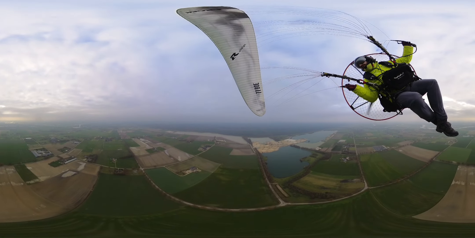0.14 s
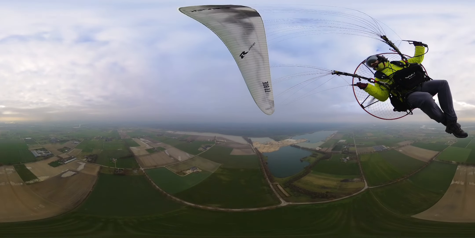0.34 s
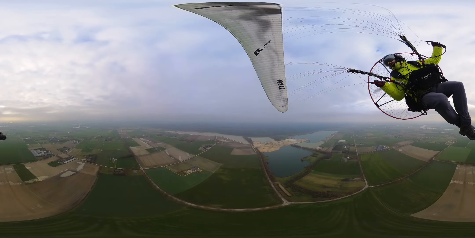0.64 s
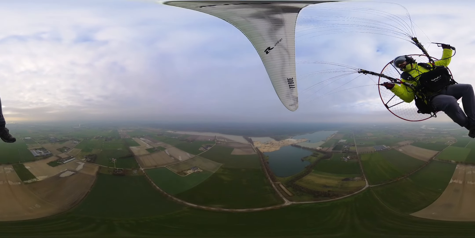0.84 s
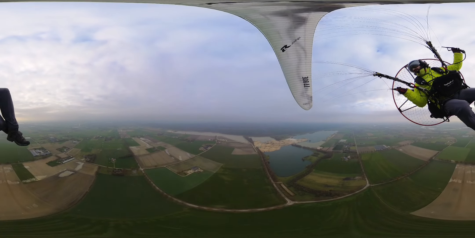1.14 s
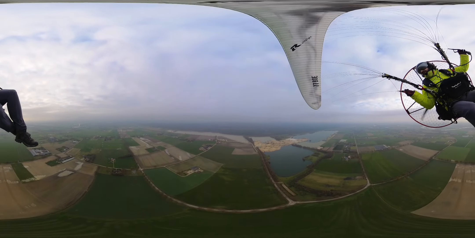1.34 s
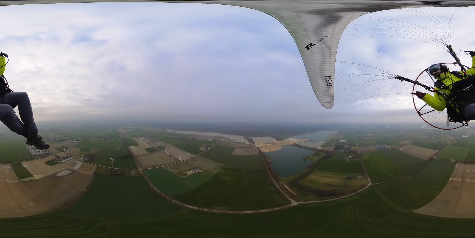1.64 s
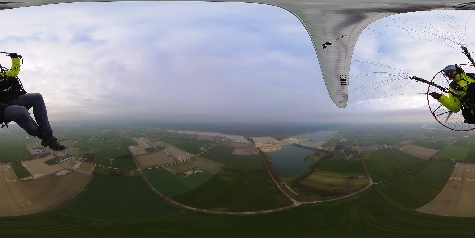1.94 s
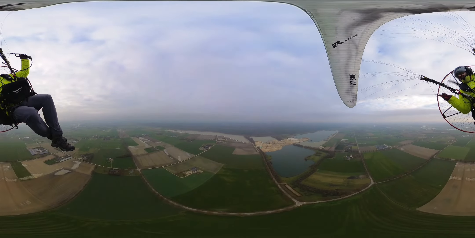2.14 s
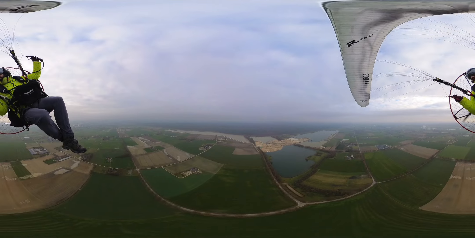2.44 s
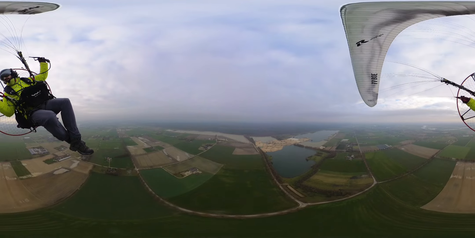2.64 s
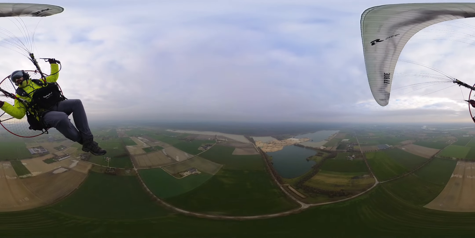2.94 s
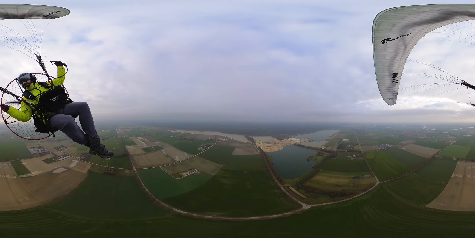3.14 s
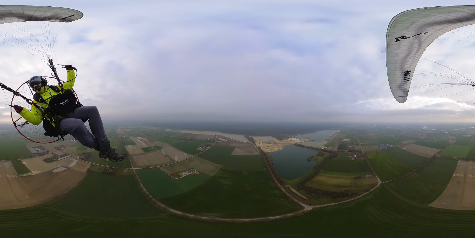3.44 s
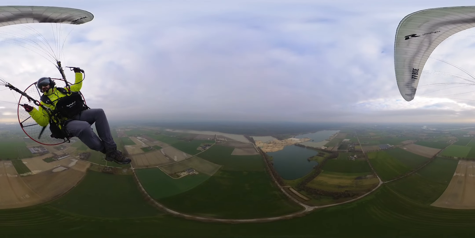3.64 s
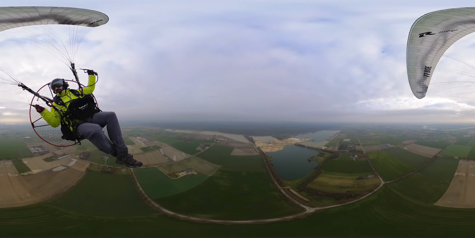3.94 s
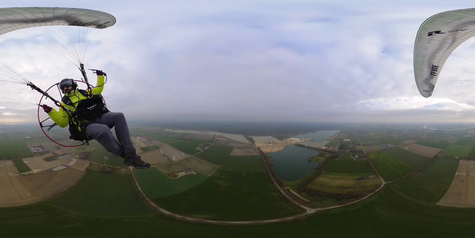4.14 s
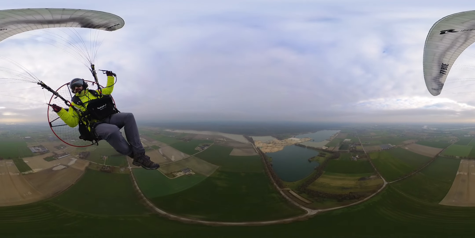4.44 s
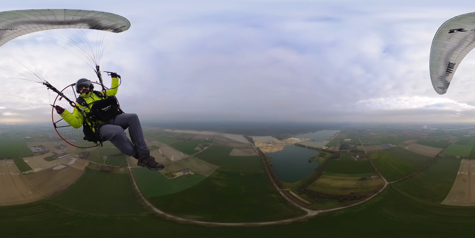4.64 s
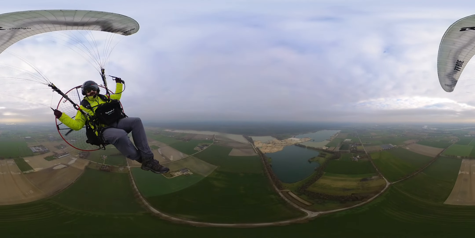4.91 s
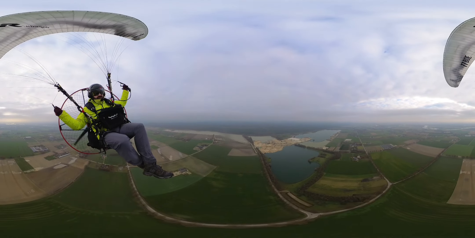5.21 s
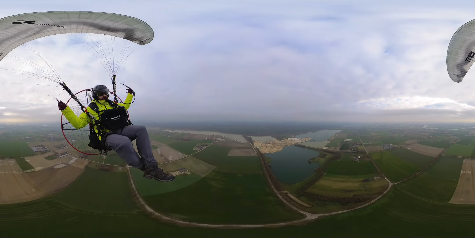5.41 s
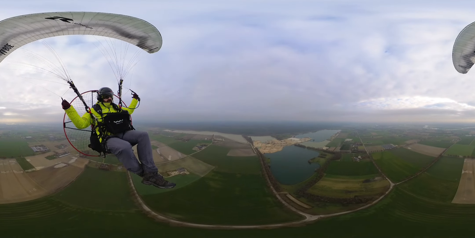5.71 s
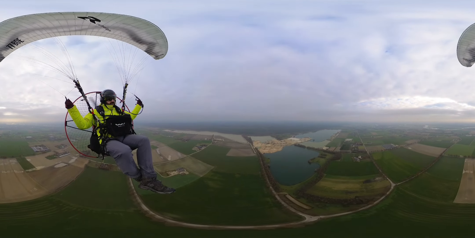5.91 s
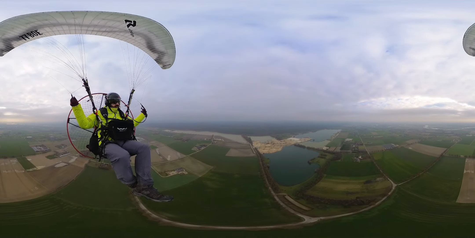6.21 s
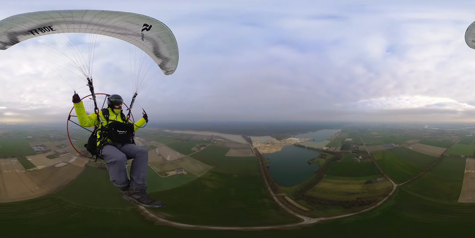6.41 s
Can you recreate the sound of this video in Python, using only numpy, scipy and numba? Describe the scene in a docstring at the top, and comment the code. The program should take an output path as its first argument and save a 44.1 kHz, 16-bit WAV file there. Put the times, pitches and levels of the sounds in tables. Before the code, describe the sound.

A single-cylinder two-stroke paramotor runs close by in open air. A second drone beats against it at first, then fades. Weak firings mix with irregular hard pops over a deep vibrating hum and rumbling, hissing wind. Brief tinny buzzes appear midway. Finally the throttle opens, the burn lopes, then steadies, and a thin high hiss swells. The microphone shares the shaking pole.

```python
"""A back-mounted one-cylinder two-stroke at part throttle in flight, heard by a camera on a pole.
First a second, steadier drone beats against the engine; it swells and sinks, then slowly rises again.
Wind rumbles and hisses throughout. Most crank turns fire weakly, some hard with a pop; the crank shakes
the pole into a deep hum. Brief tinny buzzes follow from mid-flight on. At the end the throttle opens:
speed rises, the burn lopes in threes and evens out, the hum sinks and a thin top hiss swells."""
import sys
import numpy as np
from scipy import signal
from scipy.fft import rfft, irfft
from scipy.io import wavfile
from scipy.ndimage import uniform_filter1d
from numba import njit

SR = 44100
rng = np.random.default_rng(int(sys.argv[2]) if len(sys.argv) > 2 else 0)


def to_wav(sig):
    """Store sig (one row per channel, or 1-D mono) as 16-bit WAV at the path in sys.argv[1].

    Samples outside -1..1 are clipped; the rate is SR.
    """
    pcm = np.clip(np.atleast_2d(sig), -1, 1) * 32767
    pcm = np.round(pcm).astype(np.int16)
    wavfile.write(sys.argv[1], SR, pcm.T)  # frames by channels


def gain_from_db(level_db):
    """Convert decibel levels to linear amplitude factors (20 dB per decade)."""
    decades = np.asarray(level_db, float) / 20
    return 10 ** decades


N = 289737  # samples

# All dB are relative gains within their layer.
# Wind colour. Each row: frequency in Hz, density in dB per Hz.
WIND_COLOUR = [(15, -35), (25, -17.5), (64, -8), (84, -17), (107, -14.5), (183, -11), (297, -15.5),
               (422, -20), (496, -21), (552, -24), (615, -28), (1540, -48), (3500, -58.5), (4300, -59),
               (5200, -64.5), (7000, -63.5), (14300, -58.5), (15500, -73), (15800, -90)]
# Left-right difference of the treble hiss. Each row: frequency in Hz, side minus mid in dB.
HISS_WIDTH = [(2000, -65), (2900, -22), (3300, -7), (7500, -5), (8500, -13), (15000, -19)]
# Airflow. Each row: time in seconds, hiss in dB, buffeting over the hiss in dB, low mids over the hiss in dB.
AIRFLOW = [(0, -48, -1, -0.5), (1.4, -49, -0.5, -2.5), (2.2, -53, 3, 0), (3.3, -53, 2, -0.5),
           (4.6, -55.5, 2, -0.5), (5.4, -56.5, 3.5, 0.5), (6, -51, -4.5, -0.5), (6.57, -45, -10.5, -2.5)]
# Thin hiss that climbs with the throttle. Each row: time in seconds, centre in Hz, level in dB.
TOP_HISS = [(5.7, 11250, -90), (5.92, 10200, -55), (6.2, 12000, -41.5), (6.499, 13650, -35),
            (6.57, 12900, -38)]
# Tinny buzzes. Each row: start in seconds, level in dB, length in seconds.
BUZZES = [(3.595, -51, .02), (3.716, -52, 0.025), (3.745, -56, 0.017), (4.926, -51, 0.025),
          (5.26, -54, 0.03), (5.326, -55, 0.034), (6.413, -54, .03)]
# Second drone. Each row: time in seconds, mean rate in Hz, level in dB.
DRONE = [(0, 61.66, -24), (.6, 60.8, -37), (1.2, 60.5, -23.5), (1.6, 60.42, -32), (2.2, 60.9, -50.5),
         (6.57, 60.14, -34)]
# Its harmonics. Each row: multiple of the rate, level in dB.
DRONE_HARMONICS = [(1, -11), (2, -4.5), (3, -0.5), (4, -1), (5, -2)]
# Crank. Each row: time in seconds, speed in Hz.
CRANK_SPEED = [(0, 67.3), (.6, 66.5), (1.1, 66.1), (1.4, 64.5), (1.6, 62.3), (1.9, 58.7), (2.35, 59.3),
               (2.6, 64.3), (2.78, 62), (2.9, 60.2), (3.5, 60.7), (3.72, 63.6), (3.9, 59.5), (4.12, 56.6),
               (4.5, 58.6), (4.85, 59.2), (4.95, 62), (5.3, 64), (5.42, 65.5), (5.47, 70), (5.65, 71.7),
               (6.1, 72.8), (6.57, 74.6)]
# Hard firings. Each row: pressure trough in seconds, strength in dB, crack in dB.
HARD_FIRINGS = [(0.0488, -13.5, -36.0), (0.108, -16.5, -50.0), (0.1381, -12.5, -28.0),
                (0.1982, -14.5, -32.0), (0.3628, -12.5, -31.0), (0.4223, -13.5, -34.0),
                (0.4523, -18.0, -34.0), (0.5128, -16.5, -37.0), (0.5723, -14.5, -37.0),
                (0.633, -15.0, -50.0), (0.7089, -14.5, -50.0), (0.8136, -15.0, -45.0),
                (0.9038, -15.5, -50.0), (0.9334, -13.5, -34.0), (1.0392, -13.5, -34.0),
                (1.0995, -13.0, -29.0), (1.1922, -15.0, -50.0), (1.2222, -14.0, -41.0),
                (1.283, -17.0, -36.0), (1.3754, -14.0, -32.0), (1.8104, -15.0, -50.0),
                (1.9123, -15.5, -50.0), (1.9637, -17.5, -45.0), (2.0835, -15.5, -44.0),
                (2.2187, -17.5, -39.0), (2.3201, -15.0, -50.0), (2.4041, -14.0, -39.0),
                (2.5178, -13.0, -39.0), (2.6265, -14.5, -34.0), (2.7204, -13.5, -34.0),
                (2.817, -16.5, -50.0), (3.0333, -16.5, -50.0), (3.5622, -14.0, -38.0),
                (3.6893, -12.5, -38.0), (3.7996, -17.5, -39.0), (3.9505, -13.5, -38.0),
                (4.0543, -15.5, -44.0), (4.1603, -16.0, -47.0), (4.1954, -16.5, -41.0),
                (4.3008, -16.0, -48.0), (4.3533, -17.0, -50.0), (4.4561, -13.5, -39.0),
                (4.541, -13.5, -48.0), (4.6088, -14.5, -45.0), (4.6431, -17.5, -50.0),
                (4.7972, -13.5, -38.0), (4.8981, -13.0, -36.0), (4.9935, -17.0, -48.0),
                (5.1566, -17.0, -50.0), (5.2354, -14.0, -36.0), (5.3592, -16.0, -41.0),
                (5.4064, -14.5, -41.0), (5.436, -11.5, -29.0), (5.4644, -15.5, -43.0),
                (5.4931, -11.5, -29.0), (5.5645, -12.0, -27.0), (5.6207, -12.5, -27.0),
                (5.6764, -12.0, -26.0), (5.7322, -13.5, -35.0), (5.774, -13.5, -33.0),
                (5.8157, -13.5, -34.0), (5.8573, -14.0, -32.0), (5.8987, -12.5, -34.0),
                (5.9403, -13.0, -32.0), (5.9964, -13.0, -40.0), (6.0377, -14.0, -35.0),
                (6.0787, -11.5, -30.0), (6.1192, -13.0, -31.0), (6.1605, -13.0, -30.0),
                (6.2021, -12.5, -31.0), (6.244, -12.0, -31.0), (6.2846, -12.0, -29.0),
                (6.3115, -15.0, -50.0), (6.3388, -12.5, -45.0), (6.3788, -12.5, -30.0),
                (6.4188, -12.5, -32.0), (6.4591, -14.0, -40.0), (6.4997, -14.0, -50.0),
                (6.5267, -13.0, -50.0)]
# Burn. Each row: time in seconds, ordinary firings in dB, spit of gas behind the blasts in dB.
BURN = [(0, -25.5, -62), (1.3, -31, -48), (1.9, -37, -48), (3.5, -33, -43), (3.75, -57, -44.5),
        (4.2, -27.5, -51), (5.0, -38, -47), (5.24, -36, -40), (5.45, -25, -48), (5.7, -43, -44.5),
        (5.76, -16, -46.5), (6.0, -18, -54), (6.2, -21.5, -51), (6.3, -18.5, -64), (6.57, -16.5, -61)]
# Exhaust and silencer resonances. Each row: centre in Hz, width in Hz, gain in dB, polarity.
PIPE_MODES = [(60, 509, 35.4, -1), (216, 30, 47.8, 1), (419, 177, 45.0, 1), (690, 340, 42.5, 1)]
# Pole hum. Each row: time in seconds, level at the pole's resonance in dB.
POLE_HUM = [(0, -17.5), (1.2, -20), (2, -21.5), (2.6, -17.5), (3.2, -16.5), (4.2, -17), (5, -16.5),
            (5.4, -15), (5.6, -22), (6.57, -28.5)]
# Hum overtones. Each row: multiple of crank speed, level in dB.
HUM_OVERTONES = [(1, 3), (2, -11), (3, -7.5), (4, -32)]
# Even note of the pumping crankcase. Each row: multiple of crank speed, level in dB.
CASE_OVERTONES = [(4, 9), (6, -3.5), (7, -0.5), (9, .5), (10, -9.5)]
# Lope: dB of the three turns counted from each hard firing.
LOPE_DB = [2.5, 0, -14]

LOPE_START_S, LOPE_FADE_S = 5.7272, 0.8
PORT_LEAD_S = 0.0017  # the port opens just before the pressure trough
RAGGED_DB = -31.5  # above this the burn steadies and the crankcase note grows
OPEN_HZ, FOLLOW_DB = 70, -6  # throttle open: the turn after a hard firing burns well too
POLE_HZ, POLE_WIDTH_HZ = 58.4, 12
CASE_HZ, CASE_WIDTH_HZ, CASE_LAG_S = 461, 150, 0.0015
CRACK_LEAD_S = 0.00077  # the steep front runs ahead of the blast
SPIT_LATE_S, SPIT_DECAY_S, PUFF_DECAY_S = 0.00067, 0.025, 0.0086
SILENCER_HZ = 960


def unit(x):
    """Scale to rms 1."""
    return x / np.sqrt(np.mean(x ** 2))


@njit
def svf(x, hz, width_hz):
    """State-variable band-pass with a moving centre, gain 1 there."""
    y, b, l = np.empty(len(x)), 0., 0.
    for i in range(len(x)):
        g, k = np.tan(np.pi * hz[i] / SR), width_hz / hz[i]
        v = (b + g * (x[i] - l)) / (1 + g * (g + k))
        b, l, y[i] = 2 * v - b, l + 2 * g * v, k * v
    return y


def band(x, hz, width_hz):
    """Band-pass at a fixed or moving centre."""
    return svf(x, hz + np.zeros(N), 1. * width_hz)


def noise_band(hz, width_hz, passes=1):
    """White noise through one or more equal band-passes, rms 1."""
    x = rng.standard_normal(N)
    for _ in range(passes):
        x = band(x, hz, width_hz)
    return unit(x)


def decay(x, seconds):
    """One-pole tail with this time constant."""
    return signal.lfilter([1], [1, -np.exp(-1 / (seconds * SR))], x)


def walk(rate_hz):
    """Random levels held 1 / rate_hz seconds and slewed twice, rms near 1."""
    hold = int(SR / rate_hz)
    steps = np.repeat(rng.standard_normal(N // hold + 1), hold)
    return unit(uniform_filter1d(uniform_filter1d(steps, hold), hold)[:N])


def flicker(rate_hz):
    """A walk without its slow drift."""
    x = walk(rate_hz)
    return unit(x - uniform_filter1d(x, int(2.5 * SR / rate_hz)))


def curves(table):
    """Columns of a table, one value per sample."""
    s, *columns = np.transpose(table)
    return [np.interp(np.arange(N) / SR, s, c) for c in columns]


def peak_db(hz, centre_hz, width_hz):
    """Gain of a resonance, 0 dB at its centre."""
    return -10 * np.log10(1 + (2 * (hz - centre_hz) / width_hz) ** 2)


def wind(hiss_db, buffet_db, mids_db):
    """Turbulence: half-octave noise bands that gust together and flicker alone; mid and side."""
    octave = np.log2(np.fft.rfftfreq(N, 1 / SR) + 1)
    colour, width = (gain_from_db(np.interp(octave, np.log2(np.array(t)[:, 0]), np.array(t)[:, 1]))
                     for t in (WIND_COLOUR, HISS_WIDTH))
    noise = rfft(rng.standard_normal((2, N))) * colour * [np.ones_like(width), width]
    out, gust, flutter, swell = 0, flicker(55), flicker(130), flicker(7)
    treble_db = 0.46 * gust + 0.87 * flutter + 0.42 * swell
    for centre in np.arange(4.5, 14.6, 0.5):  # log2 of Hz
        share = np.cos(np.pi * np.clip(octave - centre, -0.5, 0.5)) ** 2
        low = np.clip((8.5 - centre) / 0.4, 0, 1)  # buffeting rules the bass, flutter the rest
        db = low * buffet_db + (1 - low) * treble_db + 1.2 * flicker(45)
        db = db + (8.4 < centre < 9.6) * mids_db
        out = out + gain_from_db(db) * irfft(noise * share, N)
    return out / np.std(irfft(noise[0], N)) * gain_from_db(hiss_db + 31.0)


def top_hiss():
    """Neighbouring high noise bands that flicker in part alone and shift in pitch; mid and side."""
    hz, db = curves([(4.57, TOP_HISS[0][1], -110)] + list(TOP_HISS))
    out, spit = np.zeros((2, N)), flicker(130)
    for ratio in (0.84, 0.92, 1, 1.08, 1.16):
        for channel in range(2):
            noise = noise_band(hz * ratio, 1900, 2)
            out[channel] += noise * gain_from_db(2.5 * spit + 3.5 * flicker(85) + 2.0 * flicker(30))
    return out * gain_from_db(db + np.array([[-10.5], [-14.0]]))


def buzzes():
    """Short narrow-band noise bursts over two faint noise rings and a thin fizz near the top."""
    t = np.arange(N) / SR
    ring_db = -61 - np.minimum(((t - 5.6) / 0.41) ** 2 * 3.0, 5.0) + 0.77 * flicker(30)
    low_ring = gain_from_db(ring_db) * unit(band(band(rng.standard_normal(N), 2450, 150), 2440, 150))
    high_ring = gain_from_db(-69 + 2.3 * walk(5.95)) * noise_band(2806, 90, 2)
    fizz = gain_from_db(-65.5 + 3.3 * walk(35)) * noise_band(14750, 400, 2)
    shape = sum(gain_from_db(db) * np.exp(-((t - s - d / 2) / (d / 2)) ** 2) for s, db, d in BUZZES)
    bursts = shape * noise_band(2320, 450, 2)
    return bursts + low_ring + high_ring + fizz


def drone():
    """A few wavering harmonics on a nearly steady rate."""
    hz, db = curves(DRONE)
    turns = np.cumsum(hz * (1 + 0.0028 * walk(6))) / SR
    tones = sum(gain_from_db(g + 0.56 * walk(7.7)) * np.sin(2 * np.pi * k * turns) for k, g in DRONE_HARMONICS)
    return gain_from_db(db) * tones


def pole_hum(turns, hz, waver_db):
    """Crank unbalance shakes the pole; level and phase follow its resonance."""
    hum_db = curves(POLE_HUM)[0] + peak_db(hz, POLE_HZ, POLE_WIDTH_HZ) + waver_db
    # radians, falling through the resonance
    lead = 1.0 - 1.6 * np.arctan(2 * (hz - POLE_HZ) / POLE_WIDTH_HZ)
    shake = turns - 0.13
    return sum(gain_from_db(hum_db + db + 0.2 * k * walk(22.04)) * np.sin(2 * np.pi * k * shake + (k == 1) * lead)
               for k, db in HUM_OVERTONES)


def crankcase_note(turns, hz, lift_db):
    """Pumping crankcase: crank overtones, late, favoured near its resonance."""
    pump = turns - 0.12 - hz * CASE_LAG_S
    note_db = -33.5 + 0.49 * lift_db
    out = 0
    for k, db in CASE_OVERTONES:
        level_db = note_db + db + peak_db(k * hz, CASE_HZ, CASE_WIDTH_HZ) + 2.6 * walk(17)
        out = out + gain_from_db(level_db) * np.cos(2 * np.pi * k * pump + 0.86)
    return out


def crank(hz, at):
    """Crank angle in turns; hard firings fall on whole turns."""
    turns = np.cumsum(hz) / SR
    whole = np.cumsum(np.round(np.diff(turns[at], prepend=turns[at[0]])))
    return turns + np.interp(np.arange(N), at, whole - turns[at])


def firing_sizes(opens, hard, hard_db, open_throttle, weak_db, lift_db):
    """Uneven scavenging: dB of each turn's blast, ordinary firings scattering widely."""
    scatter_db = np.maximum(7 - 0.34 * lift_db, 1)[opens]
    size_db = weak_db[opens] + scatter_db * np.clip(rng.standard_normal(600)[:len(opens)], -3, 1.3)
    size_db = np.minimum(size_db, -13.5)
    since_s = opens / SR - LOPE_START_S
    loping, index = since_s > 0, np.arange(len(opens))
    turns_on = index - np.maximum.accumulate(np.where(np.isin(index, hard), index, 0))
    size_db += loping * np.exp(-(since_s / LOPE_FADE_S) ** 2) * np.array(LOPE_DB)[turns_on % 3]
    # a near misfire leaves the rich charge for a hard firing
    size_db[hard - 1] -= 4.5 * ~loping[hard]
    follows = open_throttle & ~loping[hard]
    size_db[hard + 1] = np.where(follows, hard_db + FOLLOW_DB, size_db[hard + 1])
    size_db[hard] = hard_db
    return size_db


def exhaust_pipe(push):
    """Blasts ring the pipe; the silencer swallows what lies above SILENCER_HZ."""
    pipe = sum(sign * gain_from_db(db) * band(push, hz, width) for hz, width, db, sign in PIPE_MODES)
    return signal.sosfiltfilt(signal.butter(4, SILENCER_HZ, fs=SR, output="sos"), pipe)


def crack(hard_opens, crack_db):
    """Steep fronts of the hard blasts: band-passed impulses."""
    fronts = np.zeros(N)
    fronts[hard_opens - int(CRACK_LEAD_S * SR)] = gain_from_db(crack_db)
    return gain_from_db(32.5) * band(band(band(fronts, 1200, 700), 1200, 700), 1240, 700)


def exhaust_gas(blasts, push, spit_db, lift_db, gas_db):
    """Gas behind each blast: a jet growing with blast power, a mid roar and a broad hiss."""
    power = np.roll(blasts, int(SPIT_LATE_S * SR)) ** 2 / gain_from_db(-19)
    jet = uniform_filter1d(decay(power, SPIT_DECAY_S), size=260)
    spit = jet * (noise_band(11300, 7500) + gain_from_db(1.5) * noise_band(3200, 2800))
    puff = decay(push, PUFF_DECAY_S)
    roar = puff * noise_band(480, 310, 2)
    hiss = unit(puff) * noise_band(2640, 21000)
    return gain_from_db(spit_db) * spit + gain_from_db(-22.5 - 0.2 * lift_db) * roar + gain_from_db(gas_db - 26.0) * hiss


def engine(gas_db):
    """One blast per turn drives pipe and gas, hard firings add a crack; the crank drives hum and case."""
    trough_s, hard_db, crack_db = np.transpose(HARD_FIRINGS)
    at = ((trough_s - PORT_LEAD_S) * SR).astype(int)
    (hz,), (weak_db, spit_db) = curves(CRANK_SPEED), curves(BURN)
    turns = crank(hz, at)
    opens = np.flatnonzero(np.diff(np.floor(turns + 1e-6)) > 0) + 1
    hard = np.abs(opens[:, None] - at).argmin(axis=0)
    lift_db = np.maximum(weak_db - RAGGED_DB, 0)
    hum_waver_db = 0.5 * flicker(16)
    blasts = np.zeros(N)
    blasts[opens] = gain_from_db(firing_sizes(opens, hard, hard_db, hz[at] > OPEN_HZ, weak_db, lift_db))
    # the port vents gradually
    push = signal.sosfilt(signal.bessel(4, 400, fs=SR, output="sos", norm="mag"), blasts)
    exhaust = exhaust_pipe(push) + crack(opens[hard], crack_db)
    exhaust = exhaust + exhaust_gas(blasts, push, spit_db, lift_db, gas_db)
    return exhaust + pole_hum(turns, hz, hum_waver_db) + crankcase_note(turns, hz, lift_db)


def scene():
    """The treble hiss differs between the ears; engine, drone and buzzes are the same in both."""
    hiss_db, buffet_db, mids_db = curves(AIRFLOW)
    mid, side = wind(hiss_db, buffet_db, mids_db) + top_hiss()
    mid = mid + engine(hiss_db) + drone() + buzzes()  # engine gas hiss follows the wind hiss level
    return np.array([mid + side, mid - side])


def band_limit(x):
    """A steep low-pass at the top of the band."""
    return signal.sosfilt(signal.butter(12, 15700, fs=SR, output="sos"), x)


def record(dry):
    """The lowest rumble is cut, the top ends near 15.7 kHz and the peaks are rounded."""
    x = signal.sosfilt(signal.butter(4, 44, "high", fs=SR, output="sos"), dry)
    x = signal.sosfilt(signal.ellip(8, 0.3, 60, 15700, fs=SR, output="sos"), x)
    return band_limit(np.tanh(1.366 * x) / 1.76)


dry = scene()
out = record(dry)
to_wav(out)
```